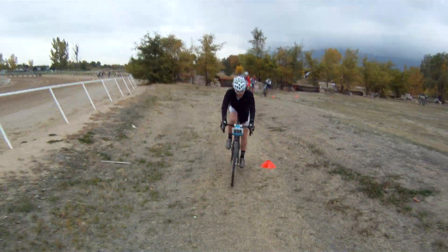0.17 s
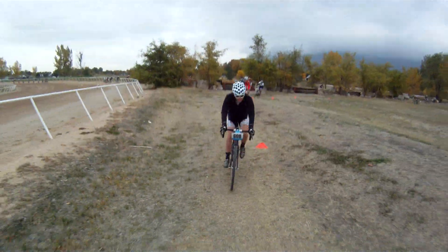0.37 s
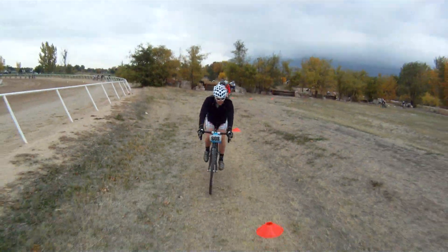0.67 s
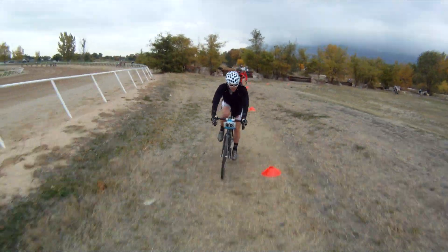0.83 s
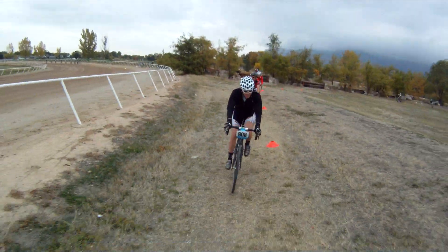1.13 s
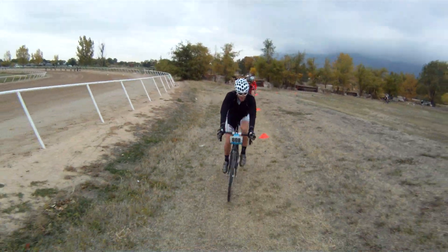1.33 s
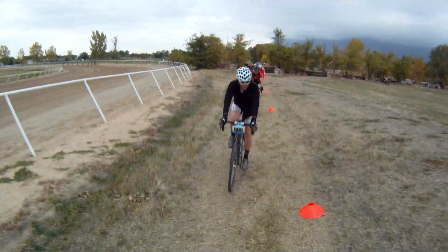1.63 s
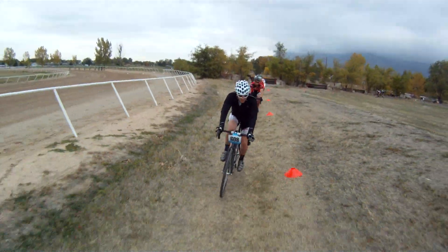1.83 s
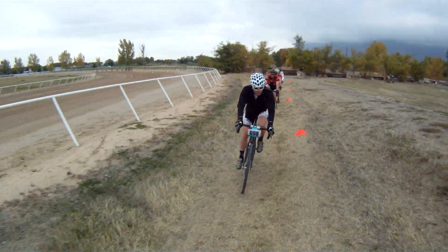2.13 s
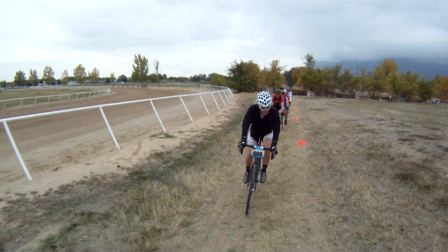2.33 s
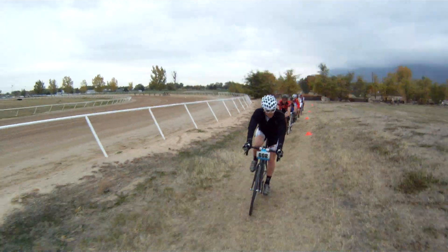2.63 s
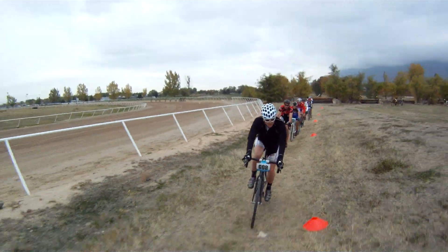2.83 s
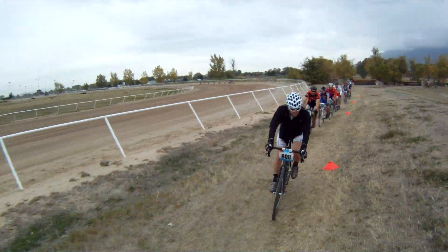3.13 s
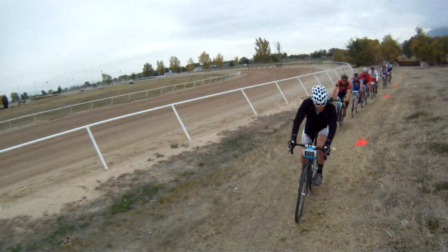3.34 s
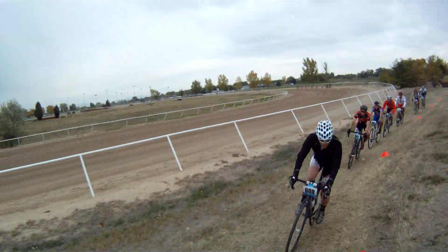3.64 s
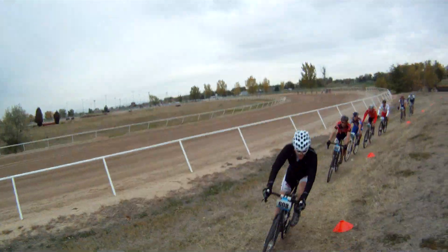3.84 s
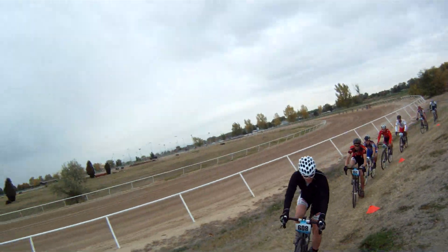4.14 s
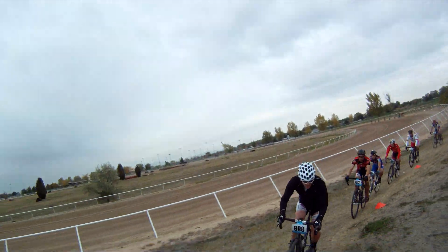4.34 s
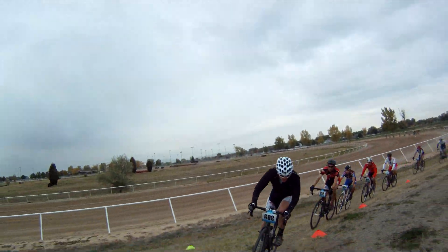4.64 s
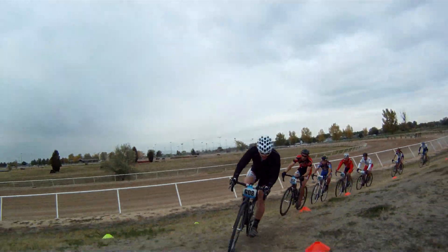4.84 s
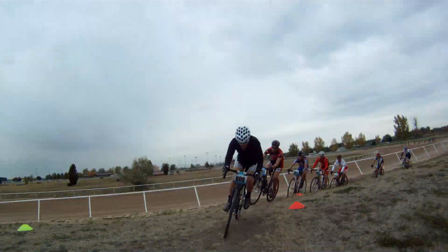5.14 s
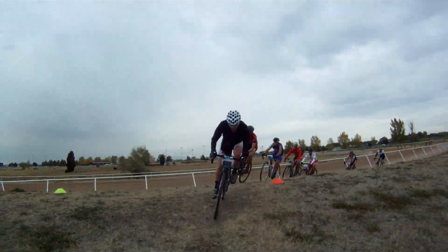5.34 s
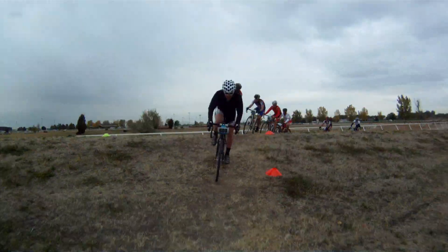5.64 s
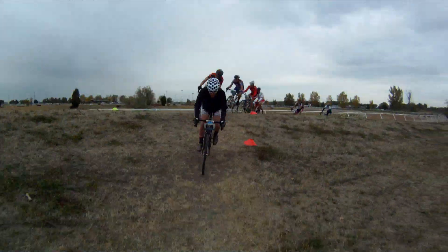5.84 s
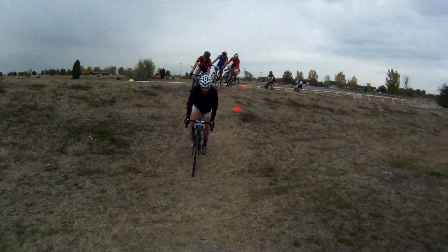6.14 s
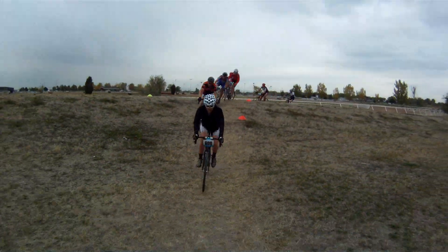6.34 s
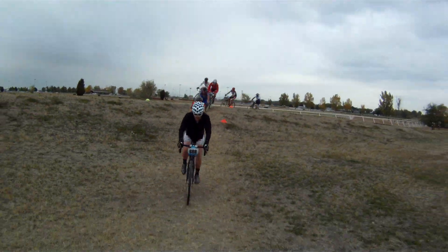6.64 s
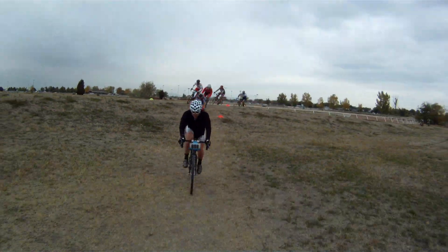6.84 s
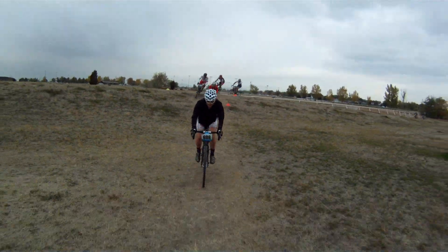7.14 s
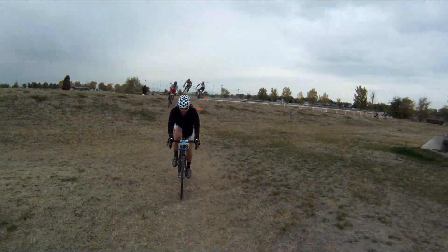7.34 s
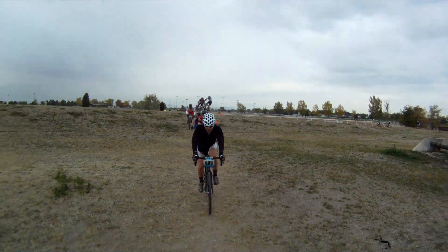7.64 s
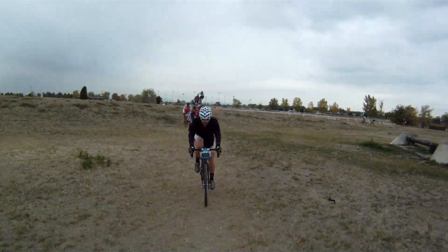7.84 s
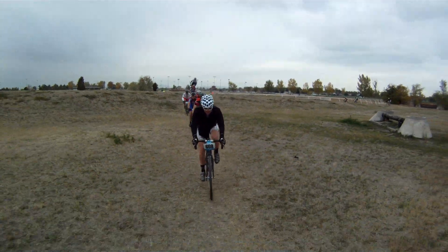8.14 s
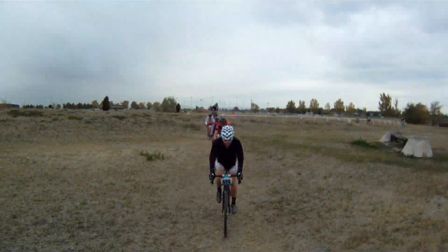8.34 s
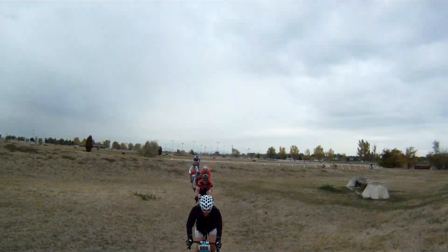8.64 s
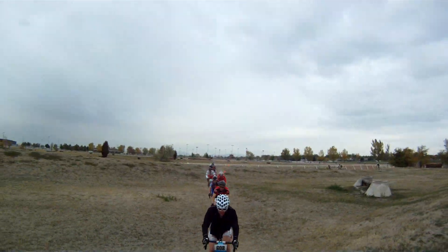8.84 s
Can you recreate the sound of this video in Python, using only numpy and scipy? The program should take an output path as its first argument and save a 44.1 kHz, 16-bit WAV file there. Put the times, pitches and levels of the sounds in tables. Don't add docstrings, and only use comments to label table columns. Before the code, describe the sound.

Low tyre rumble and gritty rattle from a bicycle on dry rough ground, with sharp stick-slip squeaks and plastic knocks from the camera clamp.

```python
import sys
import numpy as np
from scipy import signal
from scipy.fft import rfft, irfft, next_fast_len
from scipy.io import wavfile
from scipy.ndimage import uniform_filter1d, minimum_filter1d, map_coordinates

SR = 44100
rng = np.random.default_rng(int(sys.argv[2]) if len(sys.argv) > 2 else 0)


def to_linear_factor(level_db):
    exponent = np.asarray(level_db, float) / 20
    return 10 ** exponent


def wrap_up_sound(samples):
    columns = np.atleast_2d(samples).T
    tamed = np.clip(columns, -1, 1)
    steps = np.round(tamed * 32767).astype(np.int16)
    wavfile.write(sys.argv[1], SR, steps)


N = 396437

# (time [s], level [dB])
ROUGHNESS = [(0.0, -38.5), (.37, -35.5), (.8, -35.5), (2.35, -34.5), (2.68, -32.5), (3.25, -33.5),
             (3.48, -31), (3.83, -32.5), (3.93, -32), (4.38, -40), (5.51, -29.5), (5.86, -29.5),
             (6.36, -38), (7.16, -28.5), (7.59, -35.5), (8.34, -30.5), (8.56, -36.5), (8.99, -35.5)]
# (time [s], level [dB], pitch [Hz], dive [Hz per ms], jolt at the stop [dB])
JAMMED_SLIDES = [(0.689, -22.5, 2446, 120, -22), (2.389, -4.5, 2930, 70.3, -9), (2.566, -10, 2930, 128, -5),
                 (2.642, -8, 2860, 41.8, -10.5), (2.864, -13.5, 2630, 50.4, -16),
                 (3.0538, -2, 2693, 214, -5.5), (3.2276, -6, 2730, 183.3, -2),
                 (3.402, -4.5, 2970, 72.7, -5.5), (3.482, -6.5, 2840, 48.4, -11.5),
                 (3.98, -5, 2600, 155.8, -7), (4.951, -18, 2790, 42, -22), (5.044, -18.5, 2780, 81.2, -16),
                 (5.361, -19.5, 2730, 63.2, -14.5), (5.58, -9.5, 2790, 70.2, -7),
                 (5.713, -17, 2925, 66.4, -4), (6.104, -14.5, 2474, 50.7, -18),
                 (7.02, -14, 2780, 70.7, -12), (7.1717, -17, 2850, 91.8, -4.5), (7.24, -20, 2810, 53, -16),
                 (8.063, -12, 2790, 50.9, -12), (8.578, -7.5, 2600, 158.2, 1)]


def along(points, hz):
    f, v = np.transpose(points)
    return np.interp(np.log(hz + 1), np.log(f + 1), v)


def filtered(x, response):
    m = next_fast_len(N + SR // 2)
    return irfft(rfft(x, m) * response(np.fft.rfftfreq(m, 1 / SR)), m)[..., :N]


def wobble(rate):
    knots = rng.standard_normal(int(N * rate / SR) + 4)
    return map_coordinates(knots, [np.arange(N) * rate / SR])


def noise(spectrum, lumps_db, rate, cap=3):
    lumps = cap * np.tanh(wobble(rate) / cap)
    driven = rng.standard_normal(N) * to_linear_factor(lumps_db * lumps)
    x = filtered(driven, lambda hz: to_linear_factor(along(spectrum, hz)))
    return x / np.sqrt(np.mean(x ** 2))


def add(track, s, x):
    part = track[max(round(s * SR), 0):][:len(x)]
    part += x[:len(part)]


def resonance(hz, centre_hz, width_hz):
    return 1j * hz * width_hz / (centre_hz ** 2 - hz ** 2 + 1j * hz * width_hz)


def hiss():
    # (frequency [Hz], density [dB per Hz])
    hiss_spectrum = [(1000, -5.5), (3000, 3.5), (5000, -3), (5900, -18)]
    return to_linear_factor(-66.5) * noise(hiss_spectrum, lumps_db=5.2, rate=20)


def ride():
    # (frequency [Hz], density [dB per Hz])
    frame_spectrum = [(12, -45), (20, 1), (59, -2), (117, -20), (145, -18), (175, -17.5), (230, -23.5),
                      (462, -35.5), (700, -49), (910, -67.5), (1540, -120)]
    # (frequency [Hz], level [dB])
    case_spectrum = [(500, -20), (800, -6), (1130, 4), (1690, -12.5), (1950, -4), (2600, -21.5),
                     (3230, -22.5), (3630, -10.5), (4300, -42.5), (5080, -21.5), (5900, -47)]
    # (time [s], level [dB])
    grit_level = [
        (0.0, -48.5),
        (.8, -46.5),
        (2.3, -49.5),
        (4.6, -50.5),
        (6.3, -44),
        (7.6, -46.5),
        (8.3, -44.5),
        (8.99, -47.5),
    ]
    grit_follows = 0.44

    t = np.arange(N) / SR
    rough_db = np.interp(t, *np.transpose(ROUGHNESS))
    grit_db = np.interp(t, *np.transpose(grit_level)) + grit_follows * (rough_db - rough_db.mean())
    rumble = to_linear_factor(rough_db + 3.0) * noise(frame_spectrum, lumps_db=3.0, rate=26)
    grit = noise(case_spectrum, lumps_db=2.4, rate=70)
    return rumble + to_linear_factor(grit_db) * grit


def jolts():
    # (time [s], swing [dB])
    ground_and_stop_jolts = [(.354, -11.5), (.588, -13.5), (1.089, -9), (1.746, -10.5), (1.762, -15.5), (2.014, -17),
                             (2.773, -10.5), (2.79, -15), (3.033, -15), (3.205, -16), (3.597, -9.5), (3.908, -10),
                             (3.941, -7.5), (4.838, -16), (5.105, -13), (5.477, -9.5), (5.502, -15.5), (5.628, -7),
                             (5.665, -19), (5.952, -12), (6.742, -16), (7.148, -17), (7.323, -15.5), (7.467, -13),
                             (8.169, -7.5), (8.288, -14), (8.548, -13), (.447, -8), (1.026, -28), (1.792, -3.5),
                             (2.05, -13), (2.312, -13), (2.816, -10), (3.324, -27), (3.73, -16), (5.161, -17.5),
                             (6.057, -10.5), (6.804, -12), (7.049, -23), (7.871, -17.5), (8.129, -14), (8.155, -12),
                             (8.435, -13)]
    jam_stop_s = 0.00902
    return list(ground_and_stop_jolts) + [(s + jam_stop_s, db) for s, *_, db in JAMMED_SLIDES]


def bumps():
    # (time [s], swing [dB], frequency [Hz], t60 [s])
    shudders = [
        (8.661, -14.5, 50.4, 0.41),
    ]
    frame_hz, frame_width_hz, frame_ring_db = 43, 31, -6

    track = np.zeros(N)
    ms = np.arange(-SR // 25, SR // 25) / SR * 1000
    for s, db in jolts():
        snap = np.clip(rng.standard_normal(), -1, 2)
        swing = -np.tanh((ms - .6) / (2.2 * to_linear_factor(3 * snap)))
        loading = 1.58 * np.exp(-(ms / 11.2) ** 2)
        settling = 0.033 * np.exp(-(ms / 17.0) ** 2)
        add(track, s + ms[0] / 1000, to_linear_factor(db - 4.5) * swing * np.where(ms < .6, loading, settling))
    t = np.arange(SR // 2) / SR
    for s, db, hz, t60 in shudders:
        add(track, s, -to_linear_factor(db - 60 * t / t60) * np.sin(2 * np.pi * hz * t))

    def frame(hz):
        passed = hz ** 2 / (hz ** 2 + 24 ** 2) / (1 + (hz / 420) ** 4)
        return passed * (1 + to_linear_factor(frame_ring_db) * resonance(hz, frame_hz, frame_width_hz))

    return filtered(track, frame)


def knocks():
    # (time [s], peak [dB], brightness [dB])
    hard_knocks = [(0.69, -30.5, -1.5), (1.086, -23.5, -13), (1.787, -22.5, -3), (2.02, -19, 0.5),
                   (2.04, -29, 1.5), (3.026, -22.5, -9.5), (3.126, -40, 5), (3.283, -34, -2.5),
                   (3.5975, -14.5, -4), (3.6575, -13.5, -12.5), (3.727, -27, -7), (3.949, -31, -22),
                   (3.979, -13.5, 3), (3.996, -16.5, 3.5), (4.181, -26.5, -9), (5.133, -32, -26),
                   (5.18, -21.5, -3), (5.278, -24.5, -11), (5.379, -19.5, -1), (5.479, -14, -4.5),
                   (5.5495, -12.5, -5.5), (5.868, -25, 9), (5.903, -19.5, 6), (5.955, -27.5, -15),
                   (6.023, -12.5, -6), (6.197, -36, -7), (6.972, -33.5, 0.5), (7.329, -21, -1.5),
                   (7.96, -26.5, -11), (8.51, -17, -5.5), (8.577, -19.5, 2), (8.913, -22.5, -6)]
    # (time [s], peak [dB])
    taps = [
        (0.99, -35.5),
        (1.24, -38.5),
        (2.786, -32),
        (3.373, -34),
        (3.831, -32.5),
        (4.618, -36.5),
        (5.336, -33),
        (5.977, -42),
        (6.848, -32),
    ]
    # (time [s], peak [dB])
    thuds = [(0.447, -32), (1.085, -35), (2.568, -29), (3.024, -51), (3.228, -26), (3.595, -19),
             (3.656, -34), (3.977, -27), (5.177, -34), (5.275, -32), (5.377, -34), (5.479, -23),
             (5.549, -27), (5.718, -31), (6.019, -45), (7.327, -39), (7.957, -29.5), (8.506, -27),
             (8.58, -40), (8.912, -34.5)]
    # (frequency [Hz], width [Hz], level [dB])
    shell_modes = [(897, 17, -11.5), (1296, 77, 3.5), (1810, 167, 6.5), (1996, 145, 8.5), (2790, 192, -1.5),
                   (3590, 30.3, 5), (5030, 42, -12)]
    # (frequency [Hz], width [Hz], level [dB])
    mount_modes = [(330, 25, 10), (560, 64, 2)]
    tap_bright_db = -13
    give_s = 0.000993
    thud_lag_s = 0.0029
    crack_db, crack_hz, crack_top_hz = -8.5, 900, 3280

    dull, bright, low = np.zeros((3, N))
    t = np.arange(SR // 25) / SR
    for s, db, bright_db in list(hard_knocks) + [(s, db, tap_bright_db) for s, db in taps]:
        blow = rng.standard_normal(len(t)) * (to_linear_factor(-60 * t / 0.015) + to_linear_factor(-21.0 - 60 * t / 0.018))
        z = rfft(blow)
        z = z / np.sqrt(uniform_filter1d(abs(z) ** 2, size=20))
        blow = irfft(z, len(t)) * (t < .025)
        blow = blow * 8 / np.linalg.norm(blow)
        add(dull, s + give_s, to_linear_factor(db + 17.0) * blow)
        add(bright, s + give_s, to_linear_factor(db + bright_db + 24) * blow)
    for s, db in thuds:
        add(low, s + thud_lag_s, to_linear_factor(db - 17.0 - 60 * t / 0.0025))

    def ring(f, modes):
        return sum((-1) ** k * to_linear_factor(db) * resonance(f, centre, 5 * width)
                   for k, (centre, width, db) in enumerate(modes))

    def crack(f):
        return to_linear_factor(crack_db) * 1j * f / (crack_hz + 1j * f) / (1 + 1j * f / crack_top_hz) ** 3

    shell = filtered(dull, lambda f: ring(f, shell_modes[:6]) + crack(f))
    shell = shell + filtered(bright, lambda f: ring(f, shell_modes[5:]))
    return shell + filtered(low, lambda f: to_linear_factor(22.0) * ring(f, mount_modes))


def light_strokes():
    # (time [s], level [dB], rise [ms], fall [ms], pitch [Hz])
    creeps = [(0.194, -27, 8.4, 5.2, 2735), (0.534, -33, 5.6, 4.9, 2230), (0.808, -30, 12, 4.5, 2700),
              (1.564, -28, 10, 7.2, 2850), (1.722, -27.5, 8.7, 6, 2480), (1.972, -33.5, 6.6, 5.1, 2690),
              (2.226, -40.5, 5.5, 4.7, 2220), (2.497, -30.5, 13, 7.2, 2130), (2.988, -32, 11, 5.8, 2120),
              (3.162, -36.5, 13, 9.1, 2560), (3.578, -24.5, 15.5, 4.1, 2500),
              (3.679, -25.5, 9.3, 3.7, 2730), (3.899, -27, 14, 4.1, 2850), (4.678, -42, 7.6, 4, 2250),
              (4.823, -36.5, 7.4, 5.1, 2410), (4.867, -44.5, 21, 2.4, 2300),
              (4.994, -26.5, 13.4, 5.5, 2590), (5.082, -29.5, 16, 6.3, 2520), (5.651, -30.5, 15, 5.3, 2780),
              (6.159, -32, 3.3, 1.8, 2120), (6.367, -41.5, 18, 5.1, 2180), (6.39, -30.5, 9.5, 4.9, 2330),
              (6.69, -45, 19, 6.8, 2300), (6.911, -39, 14, 6.2, 2320), (6.938, -31.5, 3.2, 1.8, 2160),
              (7.544, -40.5, 7.5, 3.4, 2480), (7.702, -34.5, 9.3, 4, 2540), (7.735, -35.5, 12, 4.7, 2450),
              (7.938, -35, 5.7, 6.1, 2230), (8.229, -30.5, 15, 3.6, 2560), (8.274, -31, 12, 5, 2690),
              (8.765, -40, 11, 3.5, 2240)]
    springs = [(0.048, -37, 2.3, 9.5, 2150), (0.084, -45, 8.1, 12, 2260), (0.592, -39, 3.4, 7.1, 2420),
               (0.735, -33.5, 11, 22, 2430), (1.144, -42.5, 6.3, 12, 2470), (1.172, -41, 3.8, 8.6, 2430),
               (1.511, -33.5, 5.1, 10, 2520), (1.632, -36, 2.5, 2.6, 2150), (1.645, -44, 3.8, 12, 2030),
               (1.915, -38.5, 3.6, 9.3, 2130), (2.659, -31.5, 5.7, 16, 2230), (3.501, -27, 2.9, 12, 2020),
               (3.918, -26, 6.6, 6.4, 2480), (4.513, -28, 5.3, 9.8, 2830), (4.55, -43, 4.5, 20, 2380),
               (4.776, -39, 4.8, 8.4, 2280), (5.205, -26.5, 8.2, 8, 2380), (5.668, -51, 3.1, 22, 2290),
               (5.999, -37, 2.5, 3.3, 2150), (6.181, -26, 5.1, 12, 2470), (6.258, -42, 3.8, 9.4, 2400),
               (6.307, -42, 8.3, 11, 2210), (6.435, -36, 4.9, 15, 2290), (7.096, -31.5, 4.4, 13.4, 2580),
               (7.255, -27, 3.5, 13.5, 2590), (7.365, -40, 6.5, 8.8, 2030), (7.423, -47.5, 4.6, 9.1, 2330),
               (7.456, -24, 3.9, 4.1, 2765), (7.794, -49, 2.7, 11, 2130), (8.078, -29, 4.1, 5.3, 2600),
               (8.18, -27.5, 6.6, 17, 2420), (8.331, -41.5, 4.5, 12, 2330)]
    brushes = [(0.327, -27.5, 11, 9.1, 2630), (0.574, -27, 6.2, 6.7, 2900), (0.655, -41, 5, 5.9, 2300),
               (0.846, -42, 4.9, 4.0, 2150), (0.93, -47, 44, 17, 2400), (1.283, -35.5, 6.3, 7.2, 2290),
               (1.388, -43.5, 4.7, 7.2, 2360), (1.698, -33.5, 4.5, 4.8, 2600), (1.998, -39, 8, 4.6, 2450),
               (2.703, -31.5, 7.8, 6.5, 2510), (2.734, -30, 3.5, 4.3, 2660), (2.75, -23.5, 7.8, 6.1, 2590),
               (2.906, -28.5, 12, 9.7, 2490), (3.829, -31.5, 4.8, 3.1, 2300),
               (4.069, -33.5, 3.8, 4.3, 2680), (4.098, -32.5, 11, 11, 2600), (4.306, -43, 6.6, 6.2, 2480),
               (4.399, -46.5, 10, 10, 2220), (4.563, -49, 4.6, 3.5, 2380), (5.819, -26.5, 4.4, 5.4, 2790),
               (5.937, -24, 1.7, 1.8, 2240), (6.516, -32, 3.4, 3.3, 2460), (6.611, -38, 8.9, 7.6, 2210),
               (6.727, -28, 9.5, 6.9, 2790), (6.753, -32.5, 5.5, 9.4, 2510), (7.073, -36, 12, 5.5, 2560),
               (7.309, -31, 5.9, 4.2, 2660), (7.481, -28, 9.2, 10, 2570), (8.011, -39.5, 8.8, 7.1, 2400),
               (8.038, -34.5, 2.1, 2.7, 2330), (8.293, -36.5, 5.7, 5.1, 2570),
               (8.65, -29.5, 16, 10.6, 2760)]
    run_ups = [(0.409, -28, 5.5, 9.9, 2520), (.999, -46.5, 4, 8.5, 2600), (1.768, -26.5, 7, 22, 2720),
               (2.55, -25, 6.6, 19, 2705), (2.63, -37, 3.3, 15, 2800), (3.038, -28.5, 17, 15, 2670),
               (3.213, -29, 9.1, 8.6, 2700), (4.369, -43, 8, 5.2, 2400), (5.345, -29, 6.8, 10, 2650),
               (5.808, -29, 5.95, 6.6, 1940), (7.153, -27, 5, 6, 2770), (7.166, -20, 2.5, 5.7, 2976),
               (8.563, -25, 14, 21, 2847)]
    light_db = 1
    out = []
    for table, glide in [(creeps, -34.9), (springs, 8.1), (brushes, -9.8), (run_ups, 49)]:
        out += [(s, db + light_db, *rest, glide) for s, db, *rest in table]
    return out


def strokes():
    # (time [s], level [dB], rise [ms], fall [ms], pitch [Hz])
    slides = [(0.435, -10.5, 12.2, 9.3, 3024), (1.0135, -10, 6.3, 7.8, 2904), (1.784, -10, 1.5, 2.6, 2890),
              (2.036, -13.5, 6.9, 8.4, 2670), (2.303, -11, 6.6, 5, 2825), (2.81, -20.5, 7.4, 2, 2750),
              (3.315, -11.5, 5, 4.2, 2810), (3.716, -8.5, 8.6, 8.3, 3013), (5.155, -21, 9.9, 3, 2800),
              (5.415, -9.5, 9.6, 4.7, 2825), (5.851, -8, 19, 13.8, 3016), (6.046, -23, 18, 6.7, 2920),
              (6.796, -10, 5.1, 2.5, 2860), (7.85, -21, 4, 2.92, 2950), (7.859, -10, 5.7, 8, 3006),
              (8.12, -10.5, 8.2, 3.78, 2847), (8.141, -22, 11, 6, 2565), (8.421, -8.5, 6.5, 7.2, 3050)]
    # (time [s], level [dB], rise [ms], fall [ms], pitch [Hz])
    returns = [(0.462, -5, 4.8, 6.4, 2560), (1.055, -8, 6, 3.2, 2660), (1.803, -5.5, 6, 7.7, 2570),
               (1.817, -22, 4, 4.4, 2710), (2.072, -18, 8.7, 6.2, 2570), (2.32, -22.5, 4, 14.4, 2540),
               (2.412, -4.5, 5.6, 7.1, 2564), (2.577, -6, 2.5, 5.6, 2570), (3.07, -19, 3.6, 3.8, 1780),
               (3.0757, -24, 2.5, 1.6, 2300), (3.0795, -1, 3, 4.9, 2600), (3.24, -3, 3.5, 4.6, 2630),
               (3.336, -13, 5, 9.6, 2624), (3.423, -4.5, 7, 5.4, 2600), (3.748, -10, 2, 2.6, 2020),
               (3.756, -4, 7, 6.3, 2570), (3.951, -18, 1.5, 9.8, 2580), (3.998, -7.5, 1.6, 3.2, 1900),
               (4.007, -2, 2.5, 2.2, 2514), (4.0115, -5, 1.92, 2.2, 2600), (4.015, -11, 2.5, 6.4, 2760),
               (5.243, -20.5, 6, 14.4, 2560), (5.443, -4.5, 5, 2.5, 2666), (5.592, -18, 4, 13.4, 2740),
               (5.699, -24, 8.4, 45, 3045), (5.732, -7, 3.4, 4.9, 2620), (5.904, -6.5, 2.5, 3.2, 1873),
               (5.911, -1.5, 2.1, 5.6, 2450), (6.032, -9.5, 3.6, 2.8, 2604), (6.809, -21, 2.8, 21.6, 2620),
               (7.038, -16.5, 4.6, 4, 2560), (7.183, -12.5, 2.9, 5.6, 2630), (7.191, -19, 2.02, 6.4, 2760),
               (7.892, -8, 5.5, 7.2, 2580), (8.452, -5.5, 6.2, 4, 2640), (8.588, -2, 2.8, 1.8, 2470),
               (8.593, -8.5, 3.2, 5, 2546), (8.603, -20, 3, 2.8, 2700)]
    sag_hz = 120
    jam_rise_ms, jam_fall_ms, weak_rise_ms_per_db = 0.6, 4.65, 0.25
    jam_shorter = 0.0034
    rest_hz, climb_hz_per_ms, climb_per_hz, climb_per_db = 2600, 22.3, 0.095, 0.52

    out = [(s, db, rise, fall, hz, -sag_hz / fall) for s, db, rise, fall, hz in slides]
    for s, db, hz, dive, _ in JAMMED_SLIDES:
        rise = jam_rise_ms - weak_rise_ms_per_db * db
        out.append((s, db, rise, jam_fall_ms - jam_shorter * dive, hz, -dive))
    for s, db, rise, fall, hz in returns:
        climb = climb_hz_per_ms + climb_per_hz * (rest_hz - hz) + climb_per_db * db
        out.append((s, db, rise, fall, hz, max(climb, 4)))
    return out


def joint():
    # (frequency [Hz], density [dB per Hz])
    fast_scrape = [(700, -21), (1200, -10), (2000, -0.5), (2750, 10.5), (3200, -14.5), (3600, -0.5),
                   (5000, -36.5), (5900, -36.5)]
    # (frequency [Hz], density [dB per Hz])
    slow_scrape = [(700, -22.5), (1200, -5), (1700, -8.5), (2150, 2), (2750, -6), (3200, -15),
                   (3600, -15.5), (5900, -35)]
    dull_hz, dull_span_hz = 2150, 616
    chatter_db, chatter_swing_db = -22.5, -1
    short_ms, note_lasts = 6, 0.79
    trail_db_per_ms = 0.62

    note, drive, slow, grains = np.zeros((4, N))
    ms = np.arange(-SR // 20, SR // 20) / SR * 1000
    flutter = wobble(350)
    for s, db, rise, fall, hz, glide in strokes() + light_strokes():
        u = np.where(ms < 0, -ms / rise, ms / fall)
        way = np.sign(glide)
        turning = way * ms < 0

        bend = 7 * (1 - np.exp(np.clip(-way * ms / 7, -.7, 3))) * abs(glide)
        droop = np.where(turning, 70 * u ** 4, (.9 if glide < 0 else .3) * ms ** 2)
        pitch = np.clip(hz + bend - droop, 900, max(hz + 60, 2930))

        held = np.where(turning & (glide < 0) & (fall < short_ms), u / note_lasts, u)
        steepness = np.where(turning, 3.0, 2.2) + max(rise + fall - 18, 0) / 7
        shape_db = -9 * np.minimum(held, 4) ** steepness
        lock = 1 / (1 + np.exp(-(db + 26) / 4))
        shake = np.resize(flutter[round(s * SR) // 2:][:len(ms)], len(ms))
        unsteady = 0.05 + 0.16 * (1 - lock) + np.where(turning, .45, .3) * np.minimum(u, 3.5)
        phase = 2 * np.pi * np.cumsum(pitch) / SR + unsteady * shake

        ragged_db = 4 * np.clip(shake[::-1], -3, 1)
        overtone_db = np.where(turning, -26, -34) + (2600 - pitch) / 45 + 0.054 * shape_db + ragged_db
        tone = np.sin(phase) + lock * to_linear_factor(overtone_db) * np.sin(2 * phase + shake[::-1])

        reach = np.where(turning, u / 2.24, abs(ms) / 19)
        trail_db = 6 * np.exp(-abs(ms) / 8) - trail_db_per_ms * np.maximum(ms, 0)
        skirt = lock * to_linear_factor(-6 * reach ** 8.7 + np.where(turning, 0, trail_db))
        crackle = (glide < 0) * to_linear_factor(-10.5 - 52 * (ms / fall - 1) ** 2)

        detune_db = np.minimum(pitch - hz, 0) / 110
        body = np.sqrt(lock) * to_linear_factor(shape_db + .6 * shake) + skirt * to_linear_factor(-23 + 4 * shake)
        rub = np.sqrt(1 - lock) * to_linear_factor(-3.5 + 0.53 * shape_db)
        bright = np.clip((hz - dull_hz) / dull_span_hz, 0, 1)
        start = s + ms[0] / 1000
        add(note, start, to_linear_factor(db + 4.0 + detune_db) * body * tone)
        add(grains, start, lock * to_linear_factor(db) * crackle)
        add(drive, start, to_linear_factor(db) * (to_linear_factor(-25.0) * skirt + crackle + np.sqrt(bright) * rub))
        add(slow, start, to_linear_factor(db) * np.sqrt(1 - bright) * rub)

    rough_db = np.interp(np.arange(N) / SR, *np.transpose(ROUGHNESS))
    slow += to_linear_factor(rough_db + chatter_db + chatter_swing_db * wobble(32))
    note += to_linear_factor(1.5) * grains * np.diff(rng.standard_normal(N + 1))
    scraping = drive * noise(fast_scrape, lumps_db=7.5, rate=360, cap=1.2)
    return note + scraping + slow * noise(slow_scrape, lumps_db=2.0, rate=67, cap=1.0)


def scene():
    return (hiss() + ride() + bumps() + knocks() + joint())[None]


def gain_control(x):
    over_db = np.maximum(20 * np.log10(abs(x) + 1e-9) + 12, 0)
    held_db = -minimum_filter1d(-over_db, size=441, axis=-1)
    memory = np.exp(-np.arange(SR // 4) / (.05 * SR))
    return x * to_linear_factor(-.75 * signal.fftconvolve(held_db, memory[None] / memory.sum())[:, :N])


def low_pass(x):
    return signal.sosfilt(signal.butter(12, 16310, fs=SR, output="sos"), x)


def record(dry):
    hold_hz, top_hz = 12000, 16300
    slow = filtered(np.clip(gain_control(dry), -1, 1), lambda hz: 1 / (1 + (hz / 5950) ** 30))
    images = slow * (1 + 2 * np.cos(2 * np.pi * hold_hz * np.arange(N) / SR))
    held = filtered(images, lambda hz: np.sinc(hz / hold_hz) * (hz < top_hz) / (1 + (hz / 15550) ** 60))
    return low_pass(held)


dry = scene()
out = record(dry)
wrap_up_sound(out)
```